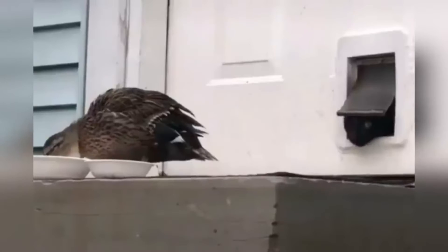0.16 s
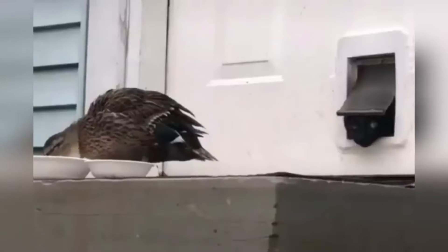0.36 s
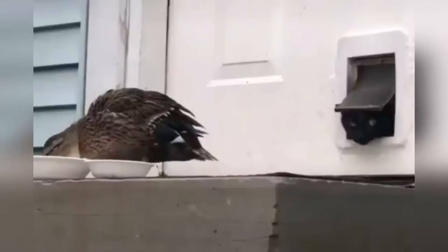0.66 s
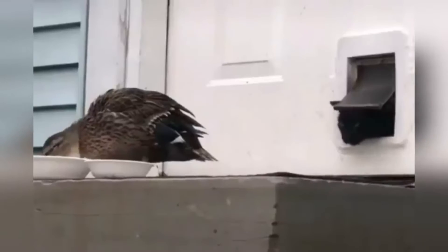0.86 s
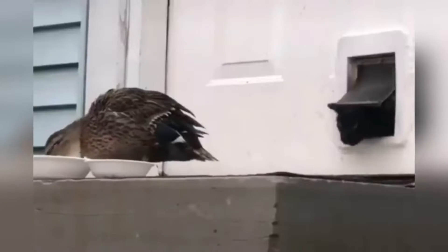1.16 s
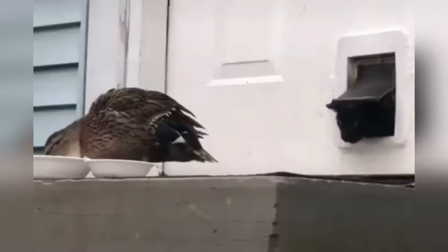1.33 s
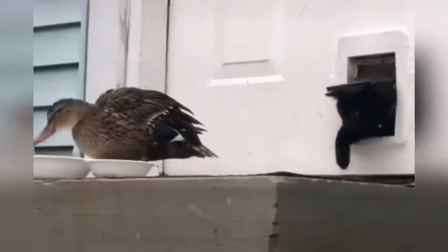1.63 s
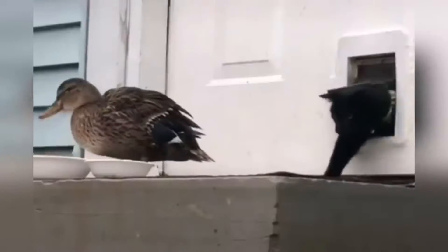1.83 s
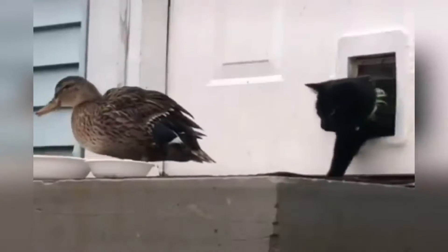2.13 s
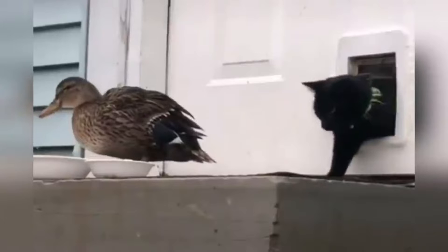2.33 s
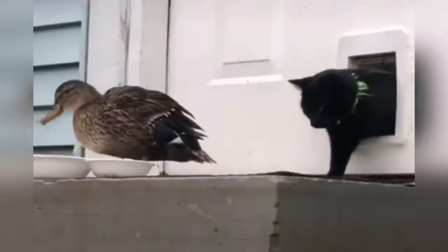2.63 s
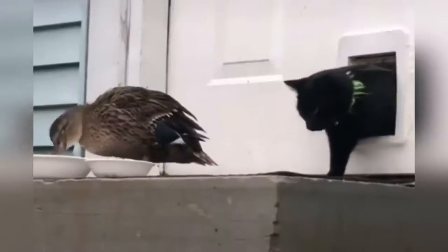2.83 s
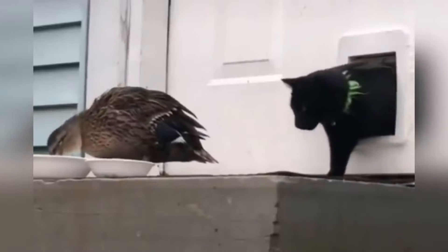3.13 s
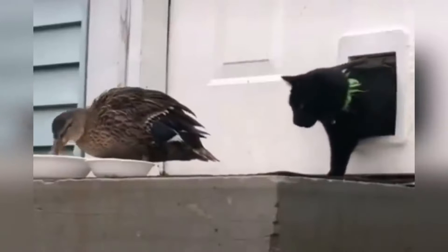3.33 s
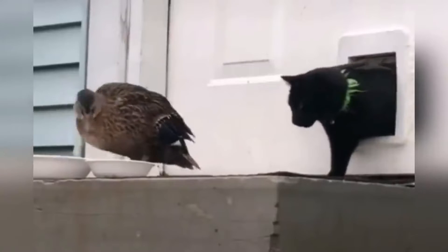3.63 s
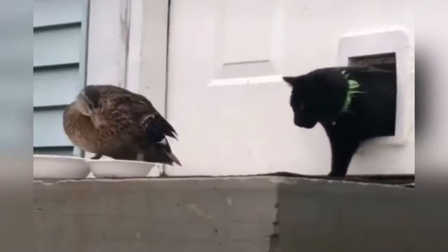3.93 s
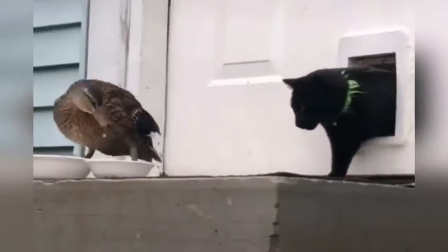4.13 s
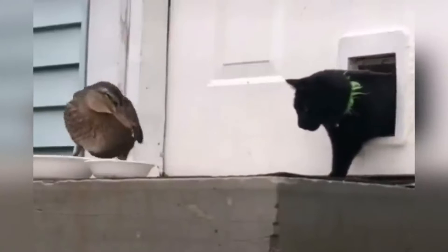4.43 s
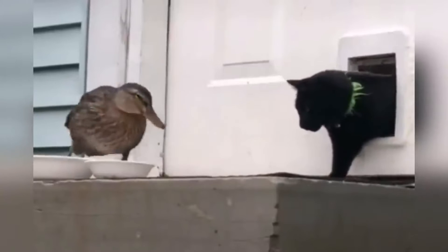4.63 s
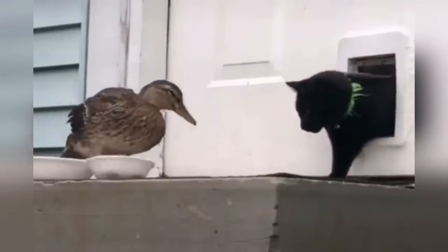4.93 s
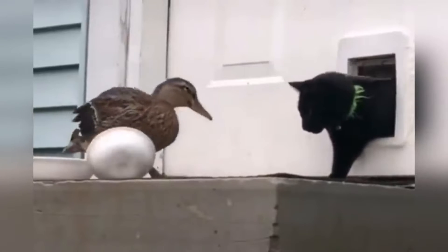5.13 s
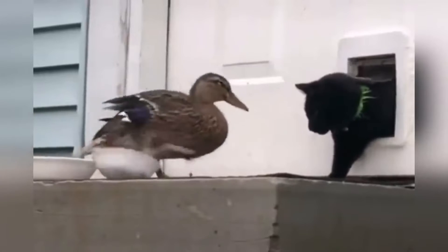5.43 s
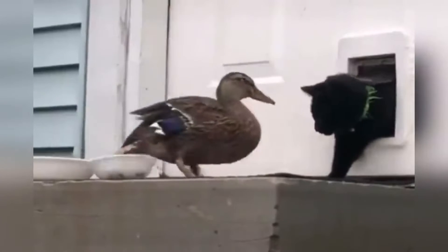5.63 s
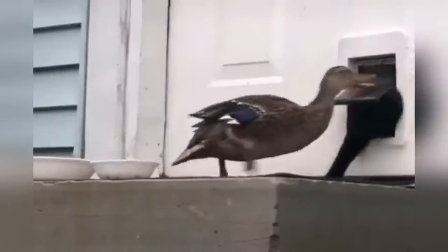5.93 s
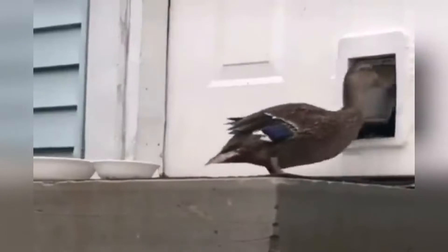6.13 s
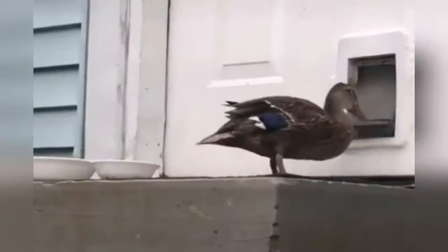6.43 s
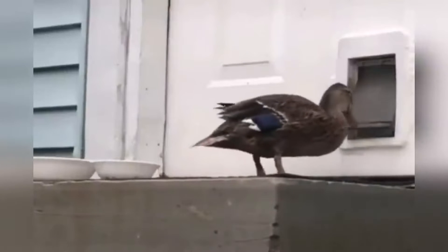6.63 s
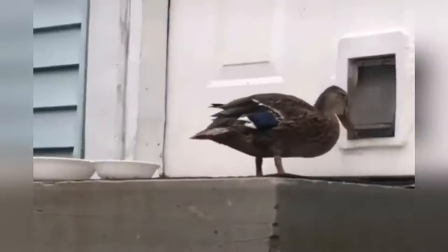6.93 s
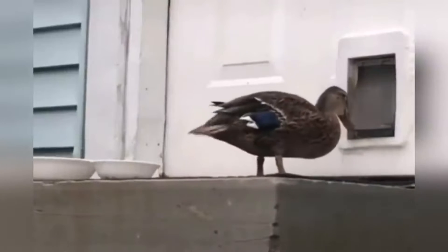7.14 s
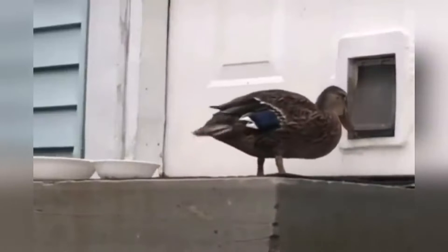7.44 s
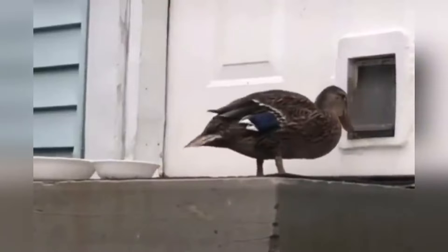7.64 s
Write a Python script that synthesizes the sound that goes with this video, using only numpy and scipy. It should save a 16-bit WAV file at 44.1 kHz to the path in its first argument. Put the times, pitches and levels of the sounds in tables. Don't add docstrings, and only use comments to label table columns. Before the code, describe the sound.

Outside a house, close to the microphone, a duck pecks lightly at glazed bowls with small ticks and drips while a bird chips nearby. A bowl tips and clashes loudly on its neighbour, ringing briefly. Then hurried knocks, claw scratches, fur rubbing and a tag jingle burst out as a cat retreats through a plastic flap. Faint traffic remains.

```python
import sys
import numpy as np
from scipy import signal
from scipy.fft import rfft, irfft, next_fast_len
from scipy.io import wavfile
from scipy.ndimage import uniform_filter1d, map_coordinates

SR = 44100
rng = np.random.default_rng(int(sys.argv[2]) if len(sys.argv) > 2 else 0)


def to_linear_factor(level_db):
    exponent = np.asarray(level_db, float) / 20
    return 10 ** exponent


def transcribe(signal):
    frames = np.atleast_2d(signal).T
    limited = np.clip(frames, -1, 1)
    pcm = np.round(limited * 32767).astype(np.int16)
    wavfile.write(sys.argv[1], SR, pcm)


N = 342921

TIPPED_MODES_HZ = [1012, 1740, 2035, 2821, 3025, 3400, 3704, 3782, 4272, 5012, 5609, 6600, 7795, 8890, 9030,
                   9400, 10320, 11230, 11910]


def unit(x):
    return x / np.sqrt(np.mean(x ** 2) + 1e-20)


def along(points, hz):
    f, v = np.transpose(points)
    return np.interp(np.log(hz + 1), np.log(f + 1), v)


def wobble(rate):
    coarse = np.arange(0, N + 16, 16)
    knots = rng.standard_normal(int(N * rate / SR) + 4)
    smooth = map_coordinates(knots, [coarse * rate / SR])
    return np.interp(np.arange(N), coarse, smooth)


def filtered(x, response):
    m = next_fast_len(len(x) + 2048, True)
    spectrum = rfft(x, m) * response(np.fft.rfftfreq(m, 1 / SR))
    return irfft(spectrum, m)[:len(x)]


def noise(spectrum):
    return unit(filtered(rng.standard_normal(N), lambda hz: to_linear_factor(along(spectrum, hz))))


def resonance(hz, centre_hz, width_hz):
    return 1j * hz * width_hz / (centre_hz ** 2 - hz ** 2 + 1j * hz * width_hz)


def add(track, s, sound):
    part = track[round(s * SR):][:len(sound)]
    part += sound[:len(part)]


def patchy(x, depth_db):
    z = signal.stft(x, nperseg=512)[2]
    field = uniform_filter1d(rng.standard_normal(z.shape), size=8, axis=0)
    field = uniform_filter1d(field, size=6, axis=1)
    return unit(signal.istft(z * to_linear_factor(depth_db * unit(field)), nperseg=512)[1][:N])


def gapped(x, share):
    z = signal.stft(x, nperseg=1024)[2]
    field = uniform_filter1d(rng.random(z.shape) - .5, size=14, axis=0)
    field = uniform_filter1d(field, size=4, axis=1)
    kept = field < np.quantile(field, np.clip(share, 0, 1))
    return signal.istft(z * kept, nperseg=1024)[1][:N]


def strokes(rows, rise, fall):
    t = np.arange(0, N + 16, 16) / SR
    s, db, hold = np.transpose(rows)[:, :, None]
    before, after = np.maximum(s - t, 0), np.maximum(t - s - np.abs(hold), 0)
    level = to_linear_factor(db - rise * before - fall * after)
    return np.interp(np.arange(N) / SR, t, np.sqrt(np.sum(level ** 2, axis=0)))


def contacts(rows, q, t60, blow_db):
    out, t = np.zeros(N), np.arange(SR // 18) / SR
    for s, db, hz in rows:
        puff = to_linear_factor(-60 * t / t60) * rng.standard_normal(len(t))
        puff[:2] += to_linear_factor(blow_db)
        sound = filtered(puff, lambda f: resonance(f, hz, hz / q) ** 3)
        add(out, s, to_linear_factor(db - 3.0) * sound / np.abs(sound).max())
    return out


def air():
    # (time [s], level [dB])
    swells = [(0.0, -58.5), (1.21, -58.5), (3.31, -59.5), (4.42, -59.5), (4.91, -58.5), (5.65, -57.5),
              (6.13, -54), (6.76, -60.5), (7.28, -57), (7.78, -60.5)]
    # (frequency [Hz], level [dB])
    traffic_colour = [(12, -61.5), (20, -42), (30, -27), (40, -9.5), (71, -7), (120, -4), (240, -9.5),
                      (350, -14.5), (900, -22.5), (1600, -33), (3000, -50), (6000, -81.5)]
    # (frequency [Hz], level [dB])
    hiss_colour = [(300, -27), (1000, -9.5), (2000, -5.5), (3500, -7), (5000, -11), (8000, -13),
                   (12500, -13), (13500, -24)]
    # (frequency [Hz], rms level [dB])
    engine_lines = [(75.4, -66), (646.0, -77.5)]
    swell_db = np.interp(np.arange(N) / SR, *np.transpose(swells))
    traffic = to_linear_factor(swell_db + 0.34 * wobble(4.6)) * noise(traffic_colour)
    hiss = to_linear_factor(-71.5 + 0.41 * wobble(0.56)) * patchy(noise(hiss_colour), depth_db=3.0)

    def engine(f):
        return sum(to_linear_factor(db + 35.5) * resonance(f, hz, 8.4) for hz, db in engine_lines)

    return traffic + hiss + filtered(rng.standard_normal(N), engine)


def pecks():
    # (time [s], peak level [dB], frequency [Hz])
    taps = [(0.346, -48.5, 4370), (1.3648, -55, 4080), (1.6422, -42, 3820), (1.703, -46, 3560),
            (1.7194, -47.5, 2340), (2.0956, -47.5, 4240), (2.1796, -51, 3000), (2.805, -48, 2980),
            (3.054, -42.5, 3040), (3.1382, -46, 2700), (3.2365, -47, 4070), (3.3364, -52.5, 4140),
            (3.566, -53, 2870), (3.8294, -52, 2830), (4.377, -52, 2380), (4.505, -55, 2820),
            (4.5794, -54, 2170), (5.001, -44, 1900), (5.006, -42, 2560)]
    return contacts(taps, q=1.08, t60=0.029, blow_db=11.5)


def rubbing():
    # (time [s], level [dB], hold [s], sign ignored)
    shuffles = [(.35, -79, -3.5), (1.38, -65, -0.04), (1.52, -73.5, 2.5), (3.02, -71, 1.25),
                (4.99, -67.5, 0.8), (5.41, -69, 1.3), (5.65, -67.5, -0.4), (6.44, -73, 0.5),
                (7.28, -65, 0.1)]
    # (time [s], level [dB], hold [s])
    rubs = [(3.138, -57.5, .003), (3.235, -58, .004), (3.565, -63, .003), (5.31, -59, .012),
            (5.35, -61, .01), (4.378, -55.5, 0.014), (5.745, -57, .008), (5.795, -52, 0.011),
            (5.926, -61.5, 0.0086), (5.975, -53, .005), (5.99, -48.5, 0.046), (6.04, -55.5, 0.034),
            (6.091, -44, 0.006), (6.108, -44, 0.01), (6.179, -39.5, 0.011), (6.195, -52.5, 0.032),
            (6.21, -57, 0.018), (6.236, -49.5, 0.012), (6.256, -50, 0.023), (6.288, -55, 0.03),
            (6.322, -55.5, 0.029)]
    # (frequency [Hz], level [dB per Hz])
    fur_colour = [(290, -32.5), (500, -7.5), (1140, -5.5), (1600, -9), (2600, -16.5), (3600, -12.5),
                  (4400, -19), (6000, -27.5), (8000, -23), (12400, -29.5), (13500, -38.5)]
    moving = strokes(rubs, rise=2200, fall=1140) + strokes(shuffles, rise=120, fall=160)
    grains = to_linear_factor(3 * wobble(400) + 0.64 * wobble(41) - 3.5)
    return moving * grains * patchy(noise(fur_colour), depth_db=3.5)


def knocks():
    # (time [s], peak level [dB], frequency [Hz])
    thuds = [(0.960, -39, 1240), (2.625, -49.5, 995), (1.296, -51.5, 455), (1.438, -45, 1300),
             (1.705, -44.5, 1280), (2.132, -43, 875), (2.806, -47.5, 1000), (3.055, -44.5, 1090),
             (3.098, -45, 755), (3.139, -45, 1290), (3.237, -52, 1400), (3.458, -43.5, 372),
             (3.459, -48, 980), (3.500, -39, 890), (4.383, -44, 974), (5.557, -54, 1600),
             (5.5665, -33, 650), (5.5668, -38.5, 1510), (5.613, -41.5, 880), (5.745, -41, 1196),
             (5.7535, -37, 1000), (5.7695, -39.5, 1300), (5.7885, -33.5, 734), (5.793, -41, 900),
             (5.797, -36, 700), (5.881, -52, 345), (5.914, -32.5, 1210), (5.918, -40, 500),
             (5.9245, -42, 900), (5.988, -37, 980), (6.0205, -31.5, 1300), (6.023, -40, 400),
             (6.089, -33, 450), (6.0905, -29, 1000), (6.0945, -22.5, 990), (6.100, -47, 895),
             (6.109, -28.5, 700), (6.1105, -29.5, 345), (6.1815, -37, 1280), (6.1845, -25, 395),
             (6.188, -39, 503), (6.193, -31, 706), (6.202, -40, 500), (6.238, -43, 1180),
             (6.265, -43, 1150), (6.279, -48, 1200), (6.309, -35, 380), (6.408, -55, 400),
             (6.543, -48, 814), (6.5445, -32.5, 380), (6.749, -41.5, 630)]
    return contacts(thuds, q=1, t60=0.06, blow_db=22)


def collar():
    # (time [s], level [dB])
    jingles = [(1.454, -67), (1.487, -58), (1.518, -59), (1.528, -55.5), (6.0195, -41.5), (6.046, -43.5),
               (6.062, -47), (6.073, -69)]
    # (frequency [Hz], level [dB], t60 [s])
    tag_modes = [(3600, -26, .05), (6244, 1.5, 0.082), (8870, -15, .05)]
    out, t = np.zeros(N), np.arange(SR // 5) / SR
    ring = sum(to_linear_factor(db - 60 * t / t60) * np.sin(2 * np.pi * hz * t) for hz, db, t60 in tag_modes)
    for s, db in jingles:
        add(out, s, to_linear_factor(db) * ring)
    return out


def bird(chips):
    out, hoarse = np.zeros(N), wobble(900)
    for s, length, start_hz, knee_hz, end_hz, db in chips:
        u = np.arange(int(length * SR)) / (length * SR)
        pitch = np.interp(u, [0, .33, 1], [start_hz, knee_hz, end_hz])
        pitch *= 1 + 0.012 * np.roll(hoarse, -round(s * SR))[:len(u)]
        phase = 2 * np.pi * np.cumsum(pitch) / SR
        swell = np.minimum(u / 0.325 + 0.055, 1) * np.minimum((1 - u) / 0.081, 1)
        throb = 1 - 0.34 * np.cos(2 * np.pi * 140 * u * length - 2.3)
        octave = to_linear_factor(-7.5) * np.clip(1 - u / 0.41, 0, 1) * np.sin(2 * phase)
        add(out, s, to_linear_factor(db) * swell * throb * (np.sin(phase) + octave))
    return out


def birds():
    # (time [s], length [s], level [dB])
    near_chips = [(1.537, 0.03, -46), (2.928, 0.026, -47.5), (4.279, 0.0245, -36), (7.763, 0.013, -69.5)]
    # (start, knee, end [Hz])
    chip_pitches = (5160, 6800, 7570)
    # (time [s], length [s], knee [Hz], end [Hz], level [dB])
    far_chips = [(1.54, 0.018, 5300, 6000, -57), (1.858, 0.029, 7780, 8930, -66.5),
                 (2.075, 0.022, 6380, 5370, -59.5), (2.153, 0.023, 6250, 5360, -63.5),
                 (2.907, 0.021, 6800, 7150, -65), (4.368, 0.023, 6640, 7700, -62),
                 (4.584, 0.046, 2250, 1800, -62)]
    # (frequency [Hz], gain [dB])
    echo_tilt = [(5000, 6), (6200, 1), (7600, -3.5), (11000, 7), (13000, 1)]
    song = bird([(s, length, *chip_pitches, db) for s, length, db in near_chips])
    far = bird([(s, length, knee_hz, knee_hz, end_hz, db) for s, length, knee_hz, end_hz, db in far_chips])
    to_walls = to_linear_factor(-4.5) * filtered(song, lambda hz: to_linear_factor(along(echo_tilt, hz))) + far
    return song + to_linear_factor(-5.0) * far + yard(to_walls, stretch=1.0)


def yard(x, stretch):
    # (frequency [Hz], t60 [s])
    decay = [(200, 0.66), (2000, 0.1), (7000, 0.165), (12000, 0.16)]
    hz, t, z = signal.stft(rng.standard_normal(SR // 2), SR, nperseg=256)
    dying = to_linear_factor(-60 * t / (stretch * along(decay, hz)[:, None]))
    tail = signal.istft(z * dying, SR, nperseg=256)[1]
    tail = tail * to_linear_factor(1.7 * wobble(200)[:len(tail)])
    return signal.fftconvolve(np.pad(x, (130, 0)), tail / np.linalg.norm(tail))[:N]


def pips():
    # (time [s], peak level [dB], frequency [Hz])
    drips = [(1.8243, -49.5, 3180), (1.8454, -54, 4100), (1.9594, -59, 2090), (2.198, -52, 3000),
             (2.3437, -58, 2810), (2.465, -58, 2850), (2.583, -55.5, 2930), (2.8479, -54.5, 2870),
             (3.5274, -52.5, 3800), (3.6541, -60.5, 3360), (3.7065, -56, 4510), (3.7244, -54, 4250),
             (3.9084, -50, 4300), (3.9669, -57, 3400), (4.0344, -60, 3400), (4.2462, -53.5, 4700),
             (4.864, -53, 2740), (5.015, -49, 3440), (5.0194, -56, 3480), (5.5653, -49, 2090),
             (6.0334, -45, 6400), (6.1144, -47, 4930), (6.6994, -62, 2650)]
    return contacts(drips, q=4.3, t60=0.042, blow_db=6.5)


def bowl(hz, modes, hits, crack_db, size, landings=()):
    touch_s = 0.00024
    out, t = np.zeros(N), np.arange(size) / SR
    hz = np.array(hz)[:, None]
    level_db, t60 = np.transpose(modes)[:, :, None]
    turning = np.exp(2j * np.pi * hz * t)
    for s, db, favoured_hz, spread, ring in hits:
        share_db = -6 * (np.log2(hz / favoured_hz) / spread) ** 2 + rng.normal(0, 1.2, hz.shape)
        heard = min(size, int(t60.max() * ring * SR) + 2048)
        in_step = np.exp(2j * np.pi * hz * (round(s * SR) / SR - hits[2][0]))
        start = to_linear_factor(level_db + share_db) * in_step
        dying = np.exp(-np.log(1000) * t[:heard] / (t60 * ring))
        ringing = (start * dying * turning[:, :heard]).imag.sum(0)
        ringing *= np.minimum(t[:heard] * min(spread, 1) / touch_s, 1)
        for landing_s, choke_db in landings:
            landed = np.clip((s + t[:heard] - landing_s) / 0.0044, 0, 1)
            ringing *= to_linear_factor(choke_db * landed * (s < landing_s))
        crack = to_linear_factor(crack_db - 60 * t[:2048] / 0.0067) * rng.standard_normal(2048)
        add(ringing, 0, filtered(crack, lambda f: resonance(f, favoured_hz, favoured_hz * spread) ** 2))
        add(out, s, to_linear_factor(db) * ringing)
    return out


def struck_bowl():
    modes_hz = [832, 1490, 2778, 4258, 5860, 7407, 8390, 9582, 10730, 11720]
    # (level [dB], t60 [s])
    modes = [(-3.5, 0.39), (-18.5, 0.94), (-4.5, 0.54), (-5, 0.18), (0, 0.1), (-1, 0.053), (-5, 0.094),
             (7, 0.15), (4, .06), (-6, 0.07)]
    # (time [s], level [dB], favoured frequency [Hz], spread [octaves], ring length [factor])
    hits = [(1.825, -55.5, 3300, 0.55, 0.32), (3.545, -63, 2800, 0.47, 0.4), (3.886, -62, 2840, .6, 0.25),
            (4.878, -46, 3280, .9, 0.66), (4.885, -60, 5860, .3, .5), (4.896, -56, 4700, 0.65, 0.4),
            (5.109, -26, 833, 0.16, 0.24), (5.197, -26, 2780, .1, 0.17), (5.21, -32, 2780, 0.1, 0.4),
            (5.225, -38, 2780, .05, 0.85), (5.205, -46, 8390, .08, 1), (5.205, -49, 5800, 0.1, 1.4),
            (5.312, -45, 5900, 0.15, 0.77), (5.454, -65, 5900, 0.36, 1.8), (5.232, -37, 1490, .15, 0.65),
            (5.278, -45, 1490, .15, 2.9), (5.55, -54, 1490, .1, .2), (5.7, -56.5, 830, .15, 3.5)]
    return bowl(modes_hz, modes, hits, crack_db=-4.0, size=SR // 2)


def tipped_bowl():
    # (level [dB], t60 [s])
    modes = [(-8.5, 0.13), (-19.5, 0.11), (-6.5, 0.084), (-0.5, 0.18), (-14.5, 0.17), (-14, 0.1),
             (-27.5, .15), (-19, 0.37), (-16.5, 0.18), (-29, 0.12), (-28, 0.068), (-25, 0.13), (-18, 0.081),
             (-15.5, 0.33), (-19.5, 0.13), (-23, 0.089), (-18, 0.15), (-25.5, 0.06), (-21.5, 0.25)]
    # (time [s], level [dB], favoured frequency [Hz], spread [octaves], ring length [factor])
    hits = [(3.885, -41.5, 8100, 0.68, 0.4), (4.968, -60, 9500, .5, .8), (5.1077, -15, 2550, 2.6, 0.6),
            (5.109, -30, 9500, 0.57, 0.91), (5.116, -29, 2821, .1, 0.92), (5.115, -18, 4270, .1, 1.3),
            (5.11, -15, 2052, 0.19, .4), (5.135, -23.5, 1012, .15, 0.56), (5.122, -25, 2821, 0.089, 1.4),
            (5.124, -26, 10600, .2, 0.65), (5.128, -24.5, 2821, .08, 0.77), (5.131, -17, 4270, 0.11, 0.64),
            (5.134, -32, 2821, 0.09, 0.77), (5.146, -25, 2821, 0.062, 1.1), (5.152, -36, 2821, .06, 0.91),
            (5.14, -24, 1012, .12, .5), (5.222, -39, 4272, .06, 1), (5.16, -29.5, 3780, 0.07, 0.91),
            (5.179, -15, 960, 0.19, 0.1), (5.195, -29.5, 1020, 0.5, 0.11), (5.165, -38.5, 4270, .06, 1.4),
            (5.201, -40, 4270, 0.07, 1.1), (5.228, -45.5, 2060, 0.13, 3.3), (5.18, -47, 10500, .4, 0.8),
            (5.205, -47, 7800, .06, .7), (5.2, -47, 11400, .08, .6), (5.15, -40, 9000, .1, 1),
            (5.209, -26, 3200, 0.26, 0.297), (5.212, -19, 3760, 0.07, 0.56),
            (5.225, -24, 3782, 0.058, 0.32), (5.31, -41, 3800, 0.3, 0.27), (5.366, -56, 2821, .06, 0.8)]
    # (time [s], ring then lost [dB])
    landings = [
        (5.139, -9),
        (5.192, -12),
    ]
    return bowl(TIPPED_MODES_HZ, modes, hits, crack_db=0.5, size=SR // 4, landings=landings)


def spatter():
    # (time [s], peak level [dB], frequency [Hz])
    drops = [(4.873, -43, 5000), (4.878, -48.5, 10500), (4.888, -55, 8500), (4.897, -54, 9500),
             (5.004, -57, 6000), (6.48, -41.5, 7390), (6.482, -36.5, 4910), (6.488, -33.5, 7300),
             (6.491, -39.5, 6490), (6.495, -51, 8030), (6.497, -42.5, 4560), (6.5, -43.5, 7280),
             (6.506, -48, 7300), (6.513, -47, 4550)]
    return contacts(drops, q=1.8, t60=0.049, blow_db=13)


def grinding():
    # (time [s], level [dB], hold [s])
    grinds = [
        (4.876, -63, .025),
        (5.09, -63, 0.013),
        (5.108, -31.5, 0.035),
        (5.197, -42, 0.016),
        (5.25, -64.5, 0.091),
    ]
    # (frequency [Hz], level [dB per Hz])
    grit_colour = [(88, -63), (150, -28), (600, -24), (950, -11), (1400, -7.5), (2100, -14.5), (3300, -8.5),
                   (4500, -19), (5200, -29), (9000, -24), (12300, -31.5), (13500, -62)]
    grit = to_linear_factor(2.8 * wobble(420)) * patchy(noise(grit_colour), depth_db=-1.0)

    def modes(f):
        width_hz, ring_db = 59, -1.5
        return 1 + to_linear_factor(ring_db) * sum(resonance(f, hz, width_hz) for hz in TIPPED_MODES_HZ[1:-5])

    return filtered(strokes(grinds, rise=9100, fall=510) * to_linear_factor(-0.5) * grit, modes)


def tinks():
    # (time [s], peak level [dB], frequency [Hz])
    rim_tinks = [(4.995, -57, 6100), (5.005, -55, 6200), (5.017, -56, 6050), (5.018, -56.5, 3480),
                 (6.19, -49.5, 740), (6.31, -57, 760), (5.567, -55, 3420), (5.7535, -56, 3430),
                 (5.8294, -60, 2260), (6.0215, -46.5, 3430)]
    return contacts(rim_tinks, q=23.2, t60=0.056, blow_db=17)


def cracks():
    # (time [s], peak level [dB], frequency [Hz])
    rim_cracks = [(5.1076, -9.5, 2080), (5.1082, -11, 3133), (5.1082, -16.5, 1100), (5.1135, -17, 3180),
                  (5.12, -12.5, 2620), (5.196, -23, 985), (5.1965, -30, 2820), (5.205, -25.5, 1110),
                  (5.209, -34, 3200), (5.211, -29, 1080)]
    return contacts(rim_cracks, q=2, t60=0.015, blow_db=10)


def flap():
    # (time [s], peak level [dB], frequency [Hz])
    booms = [(5.11, -41.5, 135), (5.118, -40.5, 449), (5.197, -40, 480), (5.567, -38.5, 187),
             (6.1095, -32.5, 297), (6.118, -32.5, 240), (6.139, -36, 230), (6.165, -44, 133),
             (6.089, -36, 240), (6.222, -42, 200), (6.128, -37, 117), (6.15, -33.5, 132), (6.184, -29, 288),
             (6.202, -36, 220)]
    # (frequency [Hz], width [Hz], level [dB])
    panel_modes = [(99, 33, 10), (140, 30, 10), (260, 23, 5), (400, 46, -30), (740, 39, -16),
                   (1020, 24, -13)]
    # (time [s], level [dB], hold [s])
    shudders = [(5.567, -49, 0.037), (5.6, -55, 0.41), (5.915, -41.5, 0), (6.02, -40, 0),
                (6.112, -40, 0.037), (6.185, -39.5, 0.034), (6.29, -46, 0)]
    panel = filtered(rng.standard_normal(N), lambda f: sum(to_linear_factor(db) * resonance(f, c, w) for c, w, db in panel_modes))
    shudder = strokes(shudders, rise=1600, fall=680) * to_linear_factor(-6.0) * unit(panel)
    return shudder + contacts(booms, q=2.2, t60=0.018, blow_db=28.0)


def claws():
    # (time [s], peak level [dB], frequency [Hz])
    scrabbles = [(5.352, -45, 2800), (5.4884, -39.5, 2860), (5.612, -37, 2420), (5.6655, -52, 2270),
                 (5.6984, -50, 1600), (5.7438, -42, 3020), (5.7535, -39, 2210), (5.792, -38, 3730),
                 (5.9145, -46, 2290), (5.9235, -41, 3160), (5.9727, -47, 2070), (5.9875, -42, 3000),
                 (6.0205, -33, 2504), (6.0895, -26.5, 3280), (6.092, -32, 2790), (6.095, -27.5, 3330),
                 (6.104, -33, 3700), (6.1775, -28, 3430), (6.179, -25, 4000), (6.181, -34, 3600),
                 (6.183, -43, 2860), (6.7405, -41.5, 2160), (6.742, -42.5, 4300), (6.7482, -41, 2144),
                 (7.2784, -50.5, 3016)]
    return contacts(scrabbles, q=1.1, t60=0.026, blow_db=14)


def sides(near, bowls, song, diffuse, small):
    # (frequency [Hz], level [dB])
    spread_curve = [(3900, -53), (4250, -7.5), (6000, -2), (8350, -4.5), (8500, -24.5), (13500, -23.5)]
    # (time [s], level [dB], hold [s])
    wide = [(1.55, -6, .03), (2.925, -5, .02), (3.135, -6, .015), (3.23, -4, .025), (3.875, -1.5, .035),
            (4.87, -3, .03), (5.085, -3, .015), (5.305, -5, .02), (5.605, -4.5, .02), (5.97, -3, .07),
            (6.1, -5, .03), (6.17, -3, .035)]

    def spread(hz):
        return to_linear_factor(along(spread_curve, hz))

    waver = wobble(600)
    bright = filtered(bowls + to_linear_factor(-12.0) * song, lambda hz: hz > 5400)
    side = filtered((to_linear_factor(-19.5) * near + to_linear_factor(-7.5) * bright) * waver, spread)
    side = side + gapped(filtered(diffuse * waver, spread), share=.8)
    flicker = to_linear_factor(-90) * patchy(rng.standard_normal(N), depth_db=16.5)
    spots = flicker + strokes(wide, rise=1500, fall=1500) * (diffuse + small) * wobble(600)
    return side + filtered(spots, lambda hz: hz > 8400)


def scene():
    small = pecks() + knocks() + pips() + spatter() + tinks() + claws()
    bowls = struck_bowl() + tipped_bowl() + grinding()
    near = bowls + cracks() + collar() + small
    song = birds()
    walls = to_linear_factor(-15) * yard(near, stretch=.6)
    diffuse = flap() + rubbing() + air()
    mid = near + walls + song + diffuse
    side = sides(near, bowls, song, diffuse, small)
    return np.array([mid + side, mid - side])


def top_cut(x):
    return signal.sosfilt(signal.butter(12, 13660, fs=SR, output="sos"), x)


def record(dry):
    kept = np.array([filtered(x, lambda hz: np.clip((13400 - hz) / 350, 0, 1)) for x in dry])
    return top_cut(kept)


dry = scene()
out = record(dry)
transcribe(out)
```